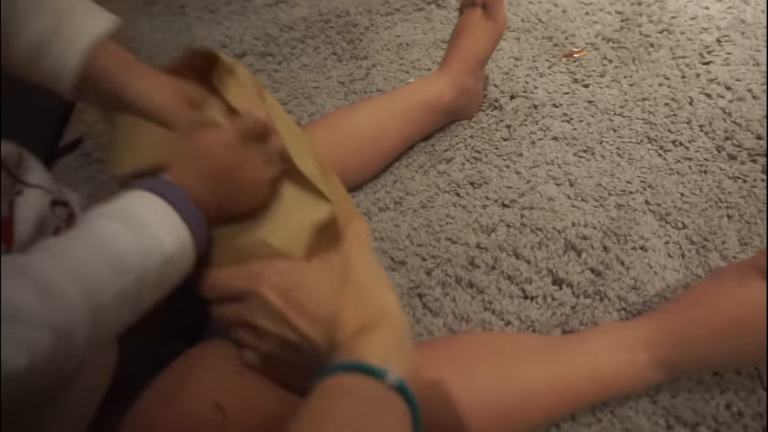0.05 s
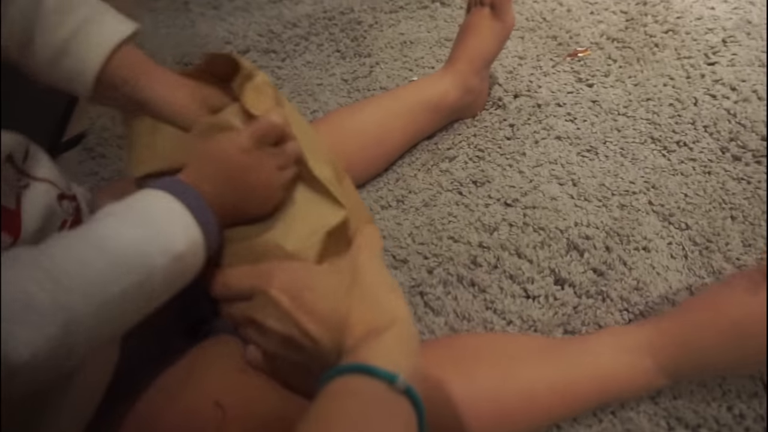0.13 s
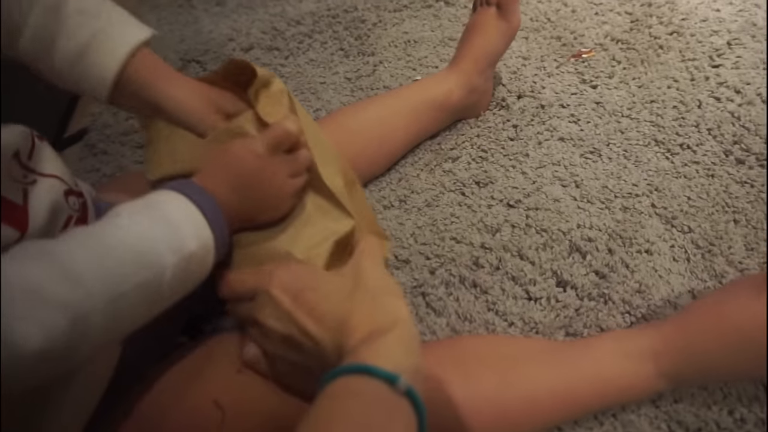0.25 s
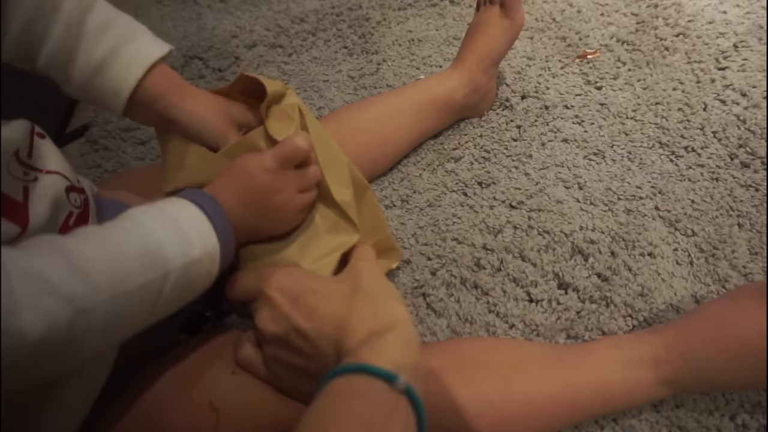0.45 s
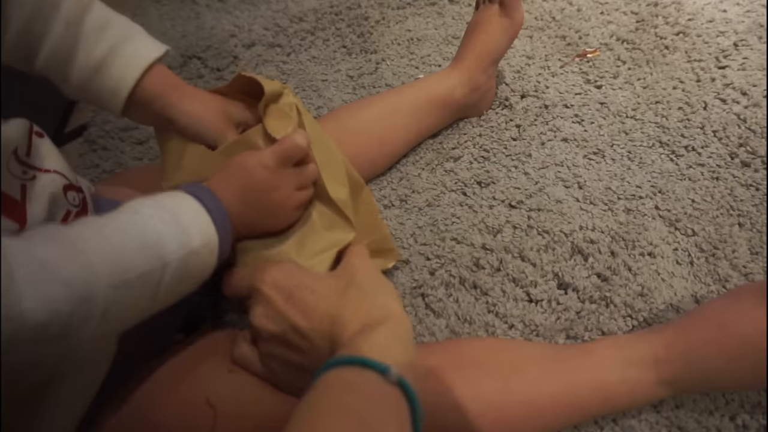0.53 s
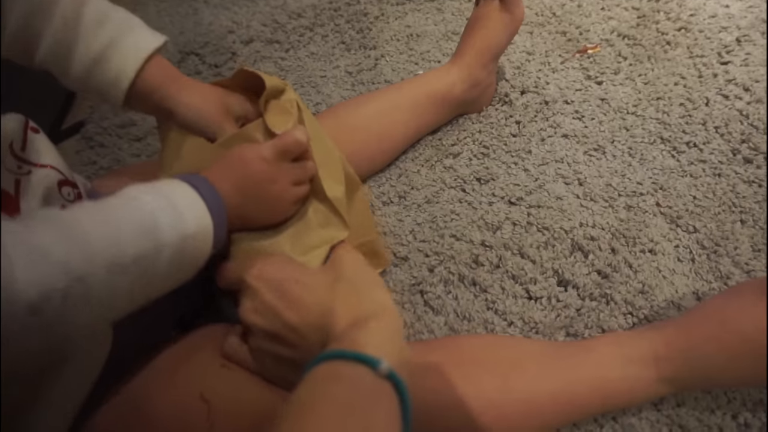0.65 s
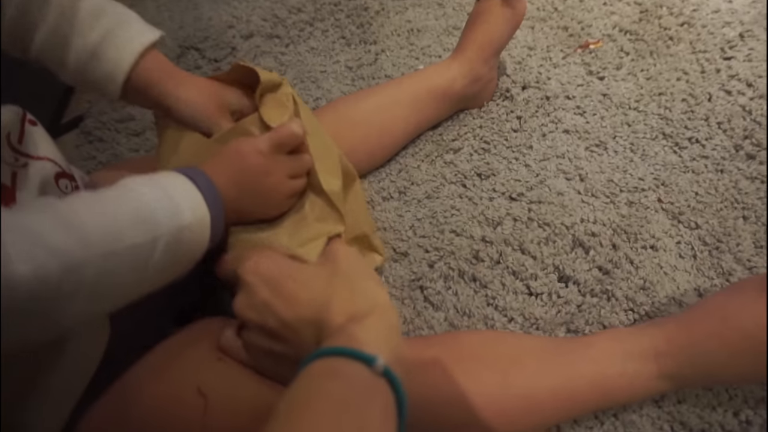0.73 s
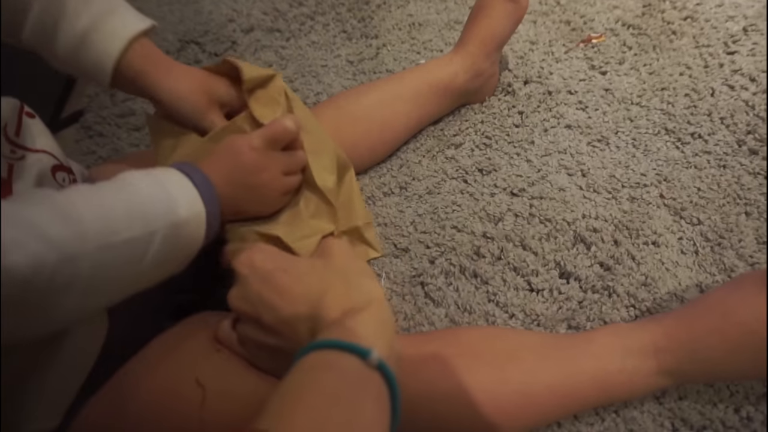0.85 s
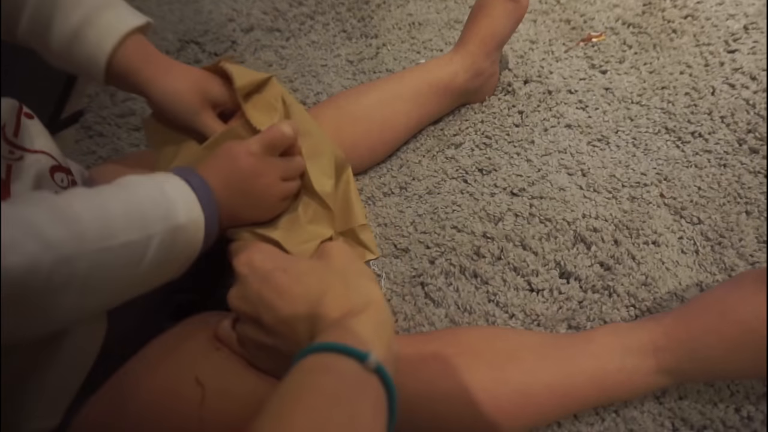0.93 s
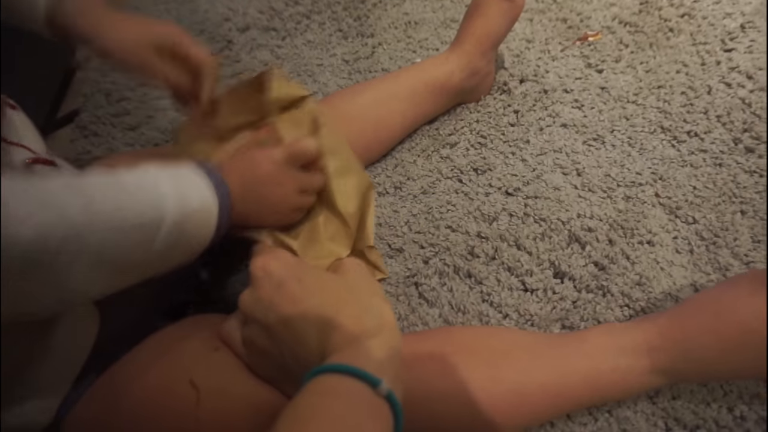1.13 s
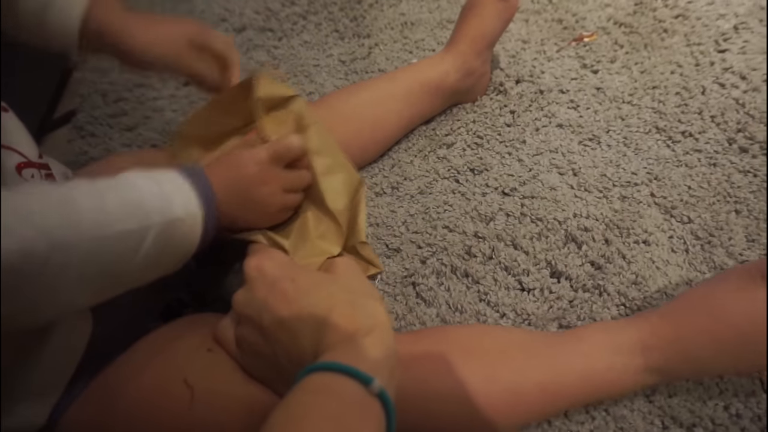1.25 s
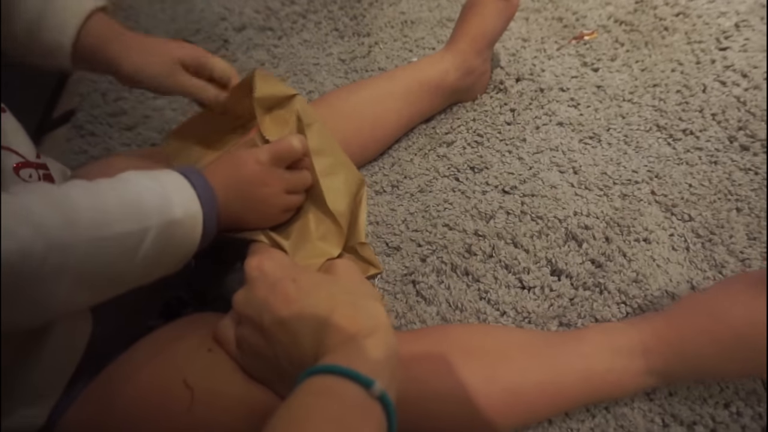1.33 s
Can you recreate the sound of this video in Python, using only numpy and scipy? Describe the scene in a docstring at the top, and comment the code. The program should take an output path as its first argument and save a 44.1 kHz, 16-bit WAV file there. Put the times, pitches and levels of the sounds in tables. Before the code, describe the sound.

A paper bag is crumpled and pulled open by hands, close and slightly left in a quiet room. After a few faint ticks, light crackles and rustling start at about 0.2 seconds. From 0.6 to 0.9 seconds come the loudest clusters of sharp cracks and dull, faintly hollow pops. After a brief lull, another cluster follows from 1.1 to 1.25 seconds, dying away by 1.4 seconds.

```python
"""A carpeted room, stereo microphone close to a paper bag that hands crumple and pull open, a little left.
Creases buckle in quick clusters: short cracks whose bending waves arrive treble first.
Wide panels flip with dull pops; in between, tiny folds crackle and the sheet rubs on itself.
The hollow of the bag rings faintly, and the room adds a short tail over still air."""
import sys
import numpy as np
from scipy import signal
from scipy.fft import rfft, irfft
from scipy.io import wavfile
from scipy.ndimage import uniform_filter1d

SR = 44100
rng = np.random.default_rng(int(sys.argv[2]) if len(sys.argv) > 2 else 0)


def pcm_store(signal):
    """Save signal as 16-bit PCM."""
    levels = np.round(np.clip(np.atleast_2d(signal), -1, 1) * 32767)
    wavfile.write(sys.argv[1], SR, levels.astype(np.int16).T)


N = 61739

# room tone (f/Hz, relative level/dB)
AIR_SPECTRUM = [(25, 5.5), (100, -8), (500, 0.5), (10000, -27)]
# how hard the hands rub and bend the sheet (t/s, level/dB)
HAND_EFFORT = [(0, -56.5), (0.191, -62), (.225, -50), (.35, -51), (.54, -50), (0.589, -54), (0.639, -41),
               (.72, -49), (.78, -42), (.88, -42.5), (.96, -47.5), (1.07, -47.5), (1.14, -41.5),
               (1.28, -56.5), (1.4, -59)]
# the strongest tiny folds (t/s, relative level/dB)
STRONG_FOLDS = [(0.28, -45.5), (0.2858, -35), (0.307, -35), (0.41, -35), (0.535, -33), (0.656, -26),
                (0.8538, -25), (0.8925, -31), (1.049, -40), (1.176, -27.5), (1.2227, -29), (1.226, -27)]
# colour of folds and rubbing (f/Hz, relative level/dB)
RUSTLE_COLOUR = [(30, -32), (150, -61), (280, -7), (520, 5.5), (900, 1), (1800, 2.5), (2700, 3),
                 (3600, 0.5), (6500, -5), (11000, -11.5)]
# buckling creases (t/s, decay/ms, relative level/dB in low, low-mid, high-mid and treble bands,
# wide panel f/Hz, small facet f/Hz)
BUCKLES = [(0.0265, 0.87, -42, -30.5, -43.5, -67, 630, 2600),
           (0.1099, 2, -50, -40.5, -33.5, -49, 1530, 2340), (0.1271, 3.4, -43.5, -35, -43, -61, 780, 2020),
           (0.2072, 1.03, -36, -30.5, -24.5, -27.5, 520, 3270),
           (0.216, 2.4, -38.5, -55, -42, -37.5, 554, 3970), (0.2294, 1.6, -55, -43, -37.5, -49, 1200, 3000),
           (0.3789, 0.9, -35, -35, -31.5, -46, 626, 2760), (0.3869, 0.8, -32, -27.5, -50, -63.5, 880, 1870),
           (0.4052, 1.4, -41.5, -29.5, -44, -60, 825, 1830),
           (0.419, 0.88, -40, -26.5, -21, -43.5, 1080, 2430),
           (0.4589, 2.6, -33.5, -35.5, -29.5, -37, 1640, 3000),
           (0.4611, 3.3, -41, -37.5, -37, -38.5, 950, 2320),
           (0.5148, 0.71, -37, -24, -22.5, -31.5, 970, 4760),
           (0.5192, 0.44, -33.5, -35, -33.5, -73, 590, 2430),
           (0.6012, 0.4, -43, -33, -29, -34.5, 1500, 2830), (0.624, 3.4, -34.5, -35.5, -30, -64, 814, 2120),
           (0.6308, 2.6, -26.5, -24.5, -41, -68, 433, 2070),
           (0.6367, 1.8, -28, -28.5, -33, -50, 1030, 2780),
           (0.6459, 0.42, -40, -34.5, -24.5, -38, 1640, 3900),
           (0.675, 1.6, -52, -26.5, -36, -64, 850, 2260), (0.687, 0.8, -42.5, -30, -29, -40.5, 1220, 2940),
           (0.6911, 1.1, -32.5, -36, -36, -57, 854, 2800),
           (0.7004, 0.38, -37.5, -24, -30.5, -46, 1510, 2280),
           (0.7357, 1.6, -36, -29, -37, -54, 1330, 1890), (0.7499, 0.85, -23.5, -24.5, -21, -29, 554, 2230),
           (0.7534, 1.13, -25, -29.5, -18.5, -27, 910, 2750), (0.765, 1.3, -29, -22, -17.5, -34, 860, 2660),
           (0.8231, 1.4, -32, -19.5, -20.5, -49, 546, 2000),
           (0.8238, 0.43, -30, -25.5, -22.5, -27, 1390, 4070),
           (0.8368, 3.2, -34, -38, -26, -34.5, 1750, 3950),
           (0.8718, 2.1, -33, -22.5, -25.5, -40, 1330, 3750),
           (0.8807, 1.14, -21.5, -29, -20, -25, 1540, 4010),
           (0.9832, 0.83, -54, -74, -28, -42.5, 1020, 5100),
           (0.9947, 2.1, -34.5, -21.5, -43, -49, 850, 2420), (1.0005, 1.9, -31, -41, -27.5, -49, 640, 2280),
           (1.0912, 0.55, -62, -65, -30, -35, 830, 5540), (1.104, 2.2, -33, -31.5, -37, -40.5, 657, 3760),
           (1.1182, 0.8, -29.5, -19.5, -28.5, -42, 547, 3540),
           (1.1215, 2.6, -37.5, -34.5, -26.5, -38, 1150, 2430),
           (1.1303, 3.1, -38.5, -30, -32.5, -37.5, 980, 2400),
           (1.1667, 1.8, -34.5, -32, -34, -58, 770, 2780), (1.1847, 0.36, -36, -37, -32.5, -45, 1060, 2720),
           (1.2303, 3.2, -40, -31.5, -33.5, -33.5, 970, 2740),
           (1.2342, 2.2, -29, -33, -28.5, -52, 730, 2390), (1.3207, 1.04, -39, -39.5, -60, -65, 776, 2300)]
# edges of those four bands (f/Hz)
CREASE_BAND_EDGES = np.array([250, 900, 2000, 4500, 11000])
# colour the paper gives creases and pops (f/Hz, level/dB)
PAPER_COLOUR = [(40, -38.5), (110, -30.5), (200, -25), (300, -14), (480, -5.5), (680, 0), (1800, -4.5),
                (2750, 0.5), (3400, -5), (4200, 2), (6500, 0.5), (10500, -2.5)]
# wide panels flipping over (t/s, relative level/dB, f/Hz at the peak)
PANEL_FLIPS = [(0.376, -25, 680), (0.4895, -30, 720), (0.5162, -22.5, 713), (0.631, -21, 620),
               (0.6762, -20, 616), (0.7505, -18, 890), (0.8738, -17, 755), (0.883, -23, 684),
               (0.926, -31, 541), (0.9498, -36.5, 900), (1.119, -15.5, 895), (1.2345, -24, 415)]
# where the paper is worked before the microphone (t/s, left over right level/dB)
HAND_POSITION = [(.2, 1.8), (.7, 1), (.9, 0.9), (1.1, 3)]
# how much the two channels differ (f/Hz, side amplitude/0-1)
SIDE_SHARE = [(100, 0), (600, 0.26), (1500, 0.32), (4000, 0.45), (10000, 0.47)]
# air resonances inside the bag (f/Hz)
HOLLOW_MODES = [471, 541.6, 657, 759, 881, 1585, 2248]
# decay of the room (f/Hz, T60/s)
ROOM_DECAY = [(200, 0.39), (2500, 0.27), (5500, 0.17), (10000, 0.14)]
# colour of the room's tail (f/Hz, level/dB)
TAIL_COLOUR = [(100, -4.5), (500, -5), (1200, -7), (2700, -4.5), (4000, -8), (10000, 4)]


def amp(db):
    return 10 ** (np.asarray(db) / 20)


def unit_rms(x):
    return x / np.sqrt(np.mean(x ** 2) + 1e-20)


def at_hz(points, hz):
    """Joins a table's points by straight lines over log frequency."""
    f, value = np.transpose(points)
    return np.interp(np.log(hz + 1), np.log(f + 1), value)


def at_time(points, s):
    return np.interp(s, *np.transpose(points))


def add(mix, s, sound):
    start = round(s * SR)
    part = mix[:, max(start, 0):start + sound.shape[1]]
    part += sound[:, max(-start, 0):][:, :part.shape[1]]


def colour(x, points):
    hz = np.fft.rfftfreq(x.shape[-1], 1 / SR)
    return irfft(rfft(x) * amp(at_hz(points, hz)), x.shape[-1])


def pan(left_db):
    return amp(np.array([[left_db], [-left_db]]) / 2)


def stereo_pair(spectra, hz):
    """Two unrelated spectra become left and right, alike in the bass."""
    share = at_hz(SIDE_SHARE, hz)
    mid, side = np.sqrt(1 - share ** 2) * spectra[0], share * spectra[1]
    return np.array([mid + side, mid - side])


def bell(hz, centre_hz, octaves):
    return np.exp(-.5 * (np.log2((hz + 1) / centre_hz) / octaves) ** 2)


def minimum_phase(gain):
    """Makes a filter ring after the blow, never before."""
    cepstrum = irfft(np.log(gain + 1e-9))
    half = len(cepstrum) // 2
    return np.exp(rfft(np.r_[cepstrum[0], 2 * cepstrum[1:half], np.zeros(half)]))


def still_air(level_db=-79):
    """Faint, steady room tone."""
    return amp(level_db) * unit_rms(colour(rng.standard_normal((2, N)), AIR_SPECTRUM))


def rustle(folds_per_s=240, fold_ms=1.58, fold_top_hz=2180, rub_db=-4.5):
    """Tiny folds tick and paper slides on paper, both following the hands' effort."""
    hz = np.fft.rfftfreq(N, 1 / SR)
    effort = amp(at_time(HAND_EFFORT, np.arange(N) / SR))
    ticks = (rng.random(N) < folds_per_s / SR) * effort
    ticks *= amp(2 + 2.5 * np.minimum(rng.exponential(1, N), 2))  # uneven strength
    for s, db in STRONG_FOLDS:
        ticks[round(s * SR)] += amp(db)
    bursts = signal.lfilter([1], [1, -np.exp(-1000 / (fold_ms * SR))], ticks)
    folds = rfft(bursts * rng.standard_normal((2, N))) / (1 + 1j * hz / fold_top_hz)
    rub = rfft(amp(rub_db) * effort * rng.standard_normal((2, N)))
    tone = unit_rms(amp(at_hz(RUSTLE_COLOUR, hz)))
    return pan(left_db=2) * irfft(stereo_pair(folds + rub, hz) * tone, N)


def fibre_slips(ms, hz, decay_ms, shiver_db=-25, shiver_ms=17.3, shiver_top_hz=2580):
    """Flattened spectrum of a tiny avalanche of slips: a snap, then the sheet shivers on."""
    rise_ms = 0.077 * decay_ms
    slips = (1 - np.exp(-ms / rise_ms)) * rng.standard_normal((2, len(ms)))
    snap = rfft(slips * np.exp(-ms / decay_ms))
    shiver = rfft(slips * np.exp(-ms / shiver_ms)) * amp(shiver_db) / (1 + 1j * hz / shiver_top_hz)
    spectrum = stereo_pair(snap + shiver, hz)
    return spectrum / np.sqrt(uniform_filter1d(abs(spectrum) ** 2, size=26, axis=1) + 1e-12)


def creases(panel_db=6, facet_db=7, bend_ms=0.42, size=4096):
    """Each buckle rings a panel and a facet; the sheet spreads the crack so the bass comes last."""
    out = np.zeros((2, N))
    hz, lead = np.fft.rfftfreq(size, 1 / SR), size // 8
    ms = np.maximum(np.arange(size) - lead, 0) * 1000 / SR
    centres_hz = np.sqrt(CREASE_BAND_EDGES[1:] * CREASE_BAND_EDGES[:-1])
    dispersion = np.exp(-4j * np.pi * bend_ms * np.sqrt(hz / 1000))  # delays 1 kHz by bend_ms
    for s, decay_ms, *bands_db, panel_hz, facet_hz in BUCKLES:
        slips = fibre_slips(ms, hz, max(decay_ms, .5))
        density_db = np.array(bands_db) - 10 * np.log10(np.diff(CREASE_BAND_EDGES))
        ring_db = panel_db * bell(hz, panel_hz, octaves=.19) + facet_db * bell(hz, facet_hz, octaves=.11)
        gain = amp(at_hz(np.c_[centres_hz, density_db], hz) + ring_db + at_hz(PAPER_COLOUR, hz))
        crack = SR * np.sqrt(.001) * irfft(slips * minimum_phase(gain) * dispersion)
        left_db = at_time(HAND_POSITION, s) + rng.standard_normal()
        add(out, s - lead / SR - bend_ms / 2000, pan(left_db) * crack)
    return out


def pops(rise_ms=1.15, sag_octaves_per_ms=0.025):
    """A wide panel flips through and swings a few cycles, its pitch sinking as it goes slack."""
    out = np.zeros((2, N))
    ms = np.arange(SR // 50) * 1000 / SR
    swing = (ms / rise_ms * np.exp(1 - ms / rise_ms)) ** 2
    sag = 2 ** (-sag_octaves_per_ms * (ms - rise_ms))
    for s, db, hz in PANEL_FLIPS:
        turns = np.cumsum(hz * sag) / SR + rng.random()
        pop = amp(db) * swing * np.sin(2 * np.pi * turns)
        add(out, s, pan(at_time(HAND_POSITION, s)) * pop)
    return colour(out, PAPER_COLOUR)


def hollow(bag, gain_db=-5.5, width_hz=22):
    """The paper excites narrow air resonances in the open bag."""
    modes = [signal.iirpeak(hz, hz / width_hz, SR) for hz in HOLLOW_MODES]
    return amp(gain_db) * sum(signal.lfilter(b, a, bag.mean(0)) for b, a in modes)


def room(bag, send_db=-9, echoes_per_s=4000, build_ms=1.8, width=0.25, size=22050):
    """Scattered reflections build up quickly and die away, treble first."""
    echoes = rng.standard_normal((2, size)) * (rng.random((2, size)) < echoes_per_s / SR)
    echoes *= 1 - np.exp(-(np.arange(size) / SR * 1000 / build_ms) ** 2)
    hz, t, spectra = signal.stft(echoes, SR, nperseg=256)
    decay = amp(-60 * t / at_hz(ROOM_DECAY, hz)[:, None])
    tail = signal.istft(spectra * decay, SR, nperseg=256)[1]
    mid, side = tail / np.linalg.norm(tail, axis=1, keepdims=True)
    response = np.array([mid + width * side, mid - width * side])
    return amp(send_db) * colour(signal.fftconvolve(bag, response, axes=1), TAIL_COLOUR)[:, :N]


def scene():
    """The bag close up and a little left of the microphone, the room behind it."""
    bag = creases() + pops() + rustle()
    treble = signal.sosfiltfilt(signal.butter(2, 3000, "high", fs=SR, output="sos"), bag)
    bag += (pan(left_db=1.5) - 1) * treble  # the treble leans further left
    bag[1] = np.r_[0, bag[1, :-1]]  # reaches the right channel one sample later
    return bag + hollow(bag) + room(bag) + still_air()


def record(dry):
    """The recorder's band limit, at 11.1 kHz."""
    lowpass = signal.firwin(91, 11100, window=("kaiser", 7), fs=SR)
    return signal.oaconvolve(dry, lowpass[None], "same")


dry = scene()
out = record(dry)
pcm_store(out)
```